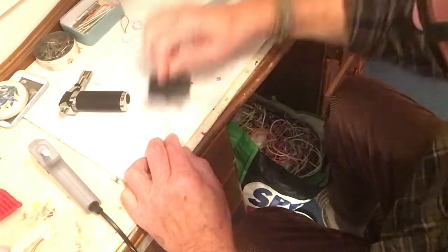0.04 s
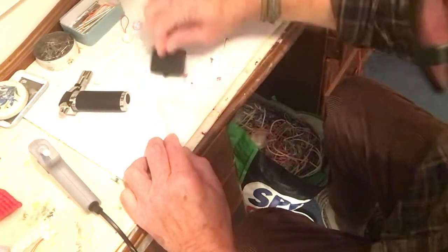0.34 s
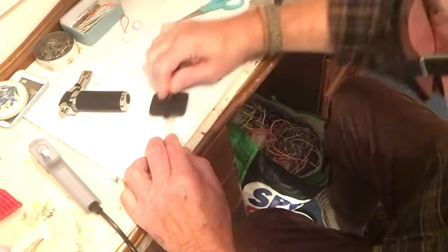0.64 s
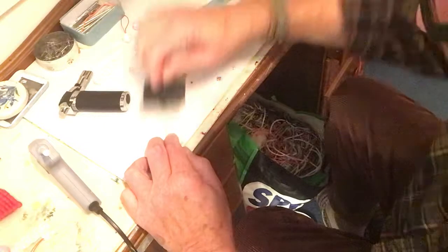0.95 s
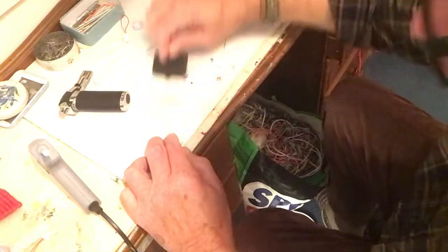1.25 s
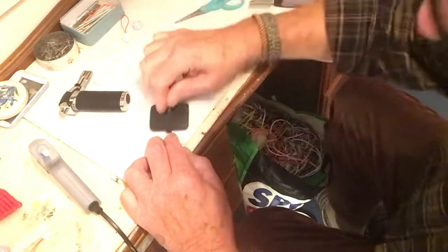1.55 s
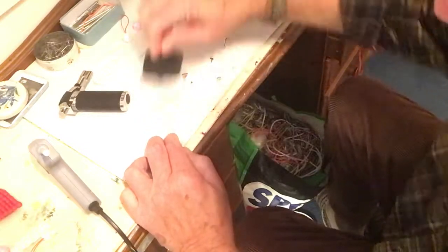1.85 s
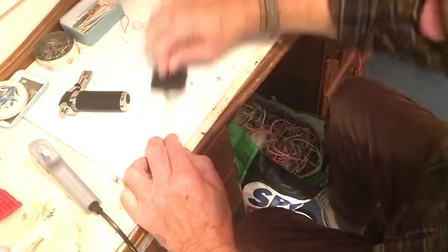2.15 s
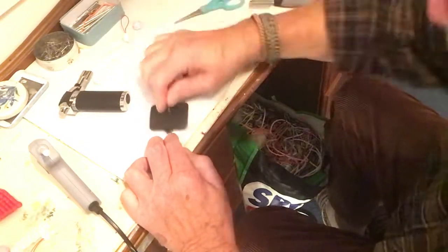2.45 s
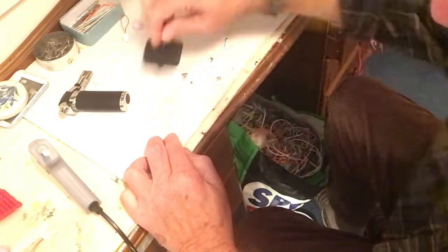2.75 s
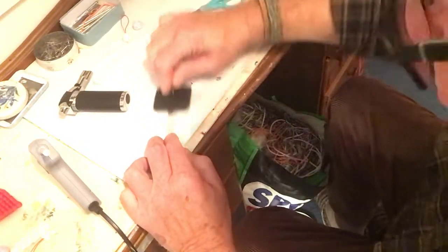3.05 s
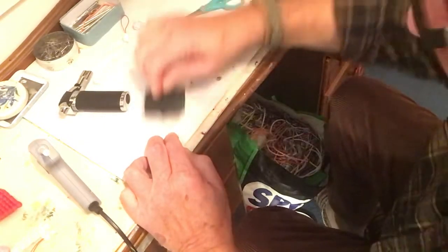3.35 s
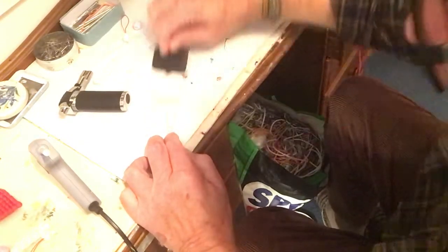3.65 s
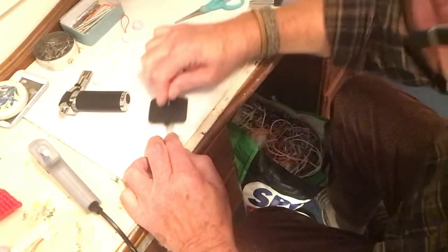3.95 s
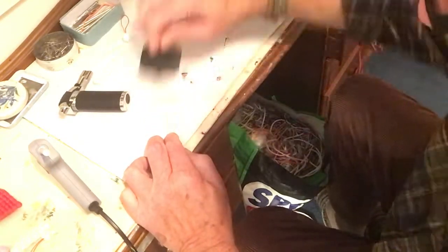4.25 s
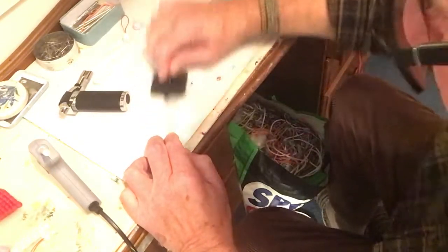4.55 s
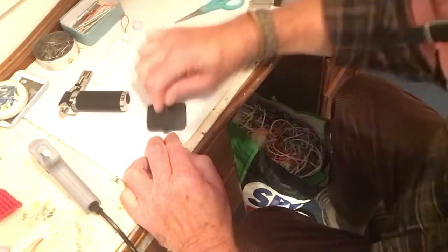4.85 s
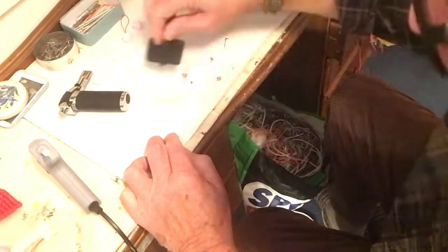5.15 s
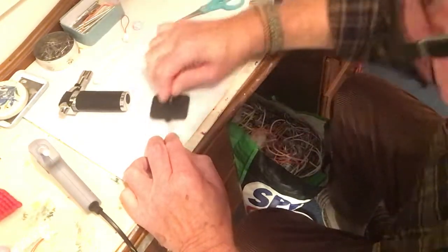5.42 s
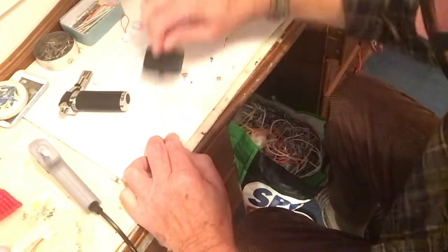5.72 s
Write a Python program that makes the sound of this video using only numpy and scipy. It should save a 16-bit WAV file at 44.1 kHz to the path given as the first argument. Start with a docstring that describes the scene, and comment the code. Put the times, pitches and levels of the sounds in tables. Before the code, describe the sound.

A small hand brush combs cord fibres on a wooden workbench in dry, scratchy strokes, about two a second, each with a light knock.

```python
"""Dry, swelling brush strokes, about two a second, each led in by a tick and a wooden knock.
A small hand brush is combing out cord fibres on a workbench. It lands and rings the bench top, then drags:
countless bristles flick over the fibres in a hiss, with a hollow rasp while the brush is pressed down
and little snaps as tangles give way. One close microphone in a small, quiet room."""
import sys
import numpy as np
from scipy import signal
from scipy.fft import rfft, irfft, next_fast_len
from scipy.io import wavfile
from scipy.ndimage import map_coordinates

SR = 44100
rng = np.random.default_rng(int(sys.argv[2]) if len(sys.argv) > 2 else 0)


def file_out(sig):
    """Save sig as 16-bit WAV at sys.argv[1]."""
    # one column per channel
    cols = np.atleast_2d(sig).T
    # limit, then scale
    lim = np.clip(cols, -1, 1)
    pcm = np.round(lim * 32767).astype(np.int16)
    wavfile.write(sys.argv[1], SR, pcm)


N = 263718

# the brush lands or bumps on the bench: (t/s, knock level/dB, thud level/dB, tick level/dB, splash level/dB)
LANDINGS = [(0.098, -41.5, -47, -42, -50.5), (0.568, -33.5, -46, -47, -48), (1.021, -26, -46, -31, -45.5),
            (1.520, -43.5, -56, -55, -51.5), (1.645, -33, -49, -33, -49), (1.995, -29.5, -46.5, -36, -45),
            (2.439, -35, -52.5, -36.5, -45), (2.898, -45, -55, -57, -71), (2.918, -35.5, -49.5, -43, -51.5),
            (3.416, -43, -51.5, -55, -52), (3.898, -42, -51.5, -54, -51), (4.389, -43, -52, -54, -50.5),
            (4.868, -35, -48, -44.5, -47.5), (5.321, -27.5, -47, -35, -50.5), (5.865, -40.5, -51, -57, -54)]
# tone colour of flicking bristles: (f/Hz, level/dB)
BRISTLE_SPECTRUM = [(60, -8.5), (260, -2), (480, 0), (700, 4), (1200, -1.5), (1700, 2), (3000, -1),
                    (4700, -2.5), (7700, -5.5), (10100, -8), (13000, -5), (14500, -7), (16000, -11)]


def amp(db):
    """Decibels to gain."""
    return 10 ** (np.asarray(db) / 20)


def unit(x):
    """Scale to rms 1."""
    return x / np.sqrt(np.mean(x ** 2) + 1e-20)


def along(points, hz):
    """Read a curve of (f/Hz, value) points on a log frequency axis."""
    f, v = np.transpose(points)
    return np.interp(np.log(hz + 1), np.log(f + 1), v)


def wobble(rate):
    """A smooth random modulator, rate knots a second."""
    return map_coordinates(rng.standard_normal(int(N * rate / SR) + 4), [np.arange(N) * rate / SR])


def filtered(x, response):
    """Filter x by a complex frequency response."""
    size = next_fast_len(N + 8192)
    return irfft(rfft(x, size) * response(np.fft.rfftfreq(size, 1 / SR)), size)[:N]


def coloured(x, spectrum):
    """x through an EQ curve of (f/Hz, level/dB), at rms 1."""
    return unit(filtered(x, lambda hz: amp(along(spectrum, hz))))


def resonant(x, modes):
    """x through resonances of (f/Hz, width/Hz, level/dB), at rms 1."""
    def response(f):
        return sum(amp(db) * 1j * f * width / (hz * hz - f * f + 1j * f * width) for hz, width, db in modes)
    return unit(filtered(x, response))


def add(track, s, sound):
    """Mix a sound in at s seconds."""
    start = max(round(s * SR), 0)
    track[start:start + len(sound)] += sound[:N - start]


def bursts(hits, t60):
    """An envelope that jumps at each (t/s, level/dB) hit and dies away."""
    envelope, t = np.zeros(N), np.arange(SR // 4) / SR
    for s, db in hits:
        add(envelope, s, amp(db - 60 * t / t60))
    return envelope


def room_tone(rumble_db=-72, air_db=-77):
    """A bed of low, uneven rumble and faint steady hiss."""
    # tone colours of the rumble and the hiss: (f/Hz, level/dB)
    rumble_spectrum = [(25, -30), (45, -0.5), (85, 0.5), (200, -3.5), (290, -4), (400, -10.5), (800, -15.5),
                       (2000, -51)]
    air_spectrum = [(150, -20), (400, -40), (800, -13.5), (1400, -6.5), (2200, -12.5), (3400, -12),
                    (8000, -17.5), (13000, -22), (15000, -27), (16000, -45)]
    rumble = coloured(rng.standard_normal(N), rumble_spectrum) * amp(3.5 * wobble(11))
    air = coloured(rng.standard_normal(N), air_spectrum)
    return amp(rumble_db) * rumble + amp(air_db) * air


def room_reverb(x, predelay_s=0.004):
    """A short diffuse answer from the walls, lingering longest in the bass."""
    # decay of the room: (f/Hz, t60/s)
    decay_times = [(150, 0.72), (1000, 0.2), (4000, 0.28), (14000, 0.17)]
    hz, t, noise = signal.stft(rng.standard_normal(SR // 2), SR, nperseg=256)
    decay = amp(-60 * t / along(decay_times, hz)[:, None])
    tail = signal.istft(noise * decay, SR, nperseg=256)[1]
    tail = np.pad(tail, (round(predelay_s * SR), 0))
    return signal.fftconvolve(x, tail / np.linalg.norm(tail))[:N]


def snags(t60=0.024, q=6, crack_db=-6):
    """Bright little snaps as tangled fibres give way, each around its own pitch."""
    # a bristle snaps free of a tangle: (t/s, level/dB, f/Hz)
    releases = [(0.184, -50, 3520), (0.281, -46, 5000), (0.638, -46, 3520), (0.725, -40, 3500),
                (0.795, -41, 3470), (0.822, -43, 2900), (1.3127, -37, 6900), (2.152, -39, 1900),
                (2.251, -44, 3080), (3.944, -57, 3500), (4.915, -55, 5030), (5.021, -46, 6000),
                (5.914, -50, 4000)]
    snaps, t = np.zeros(N), np.arange(SR // 10) / SR
    for s, db, hz in releases:
        crack = rng.standard_normal(len(t))
        ring = unit(signal.lfilter(*signal.iirpeak(hz, q, SR), crack))
        add(snaps, s, amp(db - 60 * t / t60) * (ring + amp(crack_db) * crack))
    return snaps


def flicks(per_second, clump_db):
    """Dense random bristle impulses, bunched as tufts catch and let go."""
    struck = rng.random(N) < per_second / SR
    return struck * rng.standard_normal(N) * amp(clump_db * wobble(350))


def landing_ticks(gain_db=-2, graze_db=-16, lead_s=0.0047):
    """The longest bristles graze first; the rest hit with a short tick, then splay with a brief splash."""
    # tone colour of the impact: (f/Hz, level/dB)
    tick_spectrum = [(100, -15), (600, 11.5), (1500, 7), (2300, -7), (3500, 7), (5300, 2), (7500, -13),
                     (13000, -18), (16000, -11)]
    strike = bursts([(s, db) for s, _, _, db, _ in LANDINGS], t60=0.011)
    tick = strike * coloured(rng.standard_normal(N), tick_spectrum)
    graze = bursts([(s - lead_s, db + graze_db) for s, _, _, _, db in LANDINGS], t60=0.013)
    splay = bursts([(s, db) for s, _, _, _, db in LANDINGS], t60=0.1)
    splash = (graze + splay) * coloured(flicks(per_second=6000, clump_db=-2.5), BRISTLE_SPECTRUM)
    return amp(gain_db) * (tick + splash)


def bench_knocks(gain_db=-4, attack_cycles=1.23, deep_hz=200, scatter_db=0.5, settle_s=0.043, mute_db=-6):
    """Each landing rings the bench; the weight of the hand drives its deepest modes."""
    # modes of the wooden top: (f/Hz, level/dB, t60/s)
    bench_modes = [(78.5, 5.5, 0.23), (110.8, 7, 0.25), (138, -2, 0.29), (169, 4.5, 0.27),
                   (235.7, -5, 0.26), (267.2, -6, 0.29), (289.2, -3, 0.2), (314.3, -13, 0.26),
                   (353.3, -3.5, 0.18), (425, -15.5, 0.11), (456, -15, 0.1), (552, -12, 0.071),
                   (598, -19.5, 0.032), (677, -12, 0.044), (834, -19.5, 0.063)]
    bench, t = np.zeros(N), np.arange(SR // 2) / SR
    hz, mode_db, t60 = np.transpose(bench_modes)[:, :, None]
    swell = 1 - np.exp(-hz * t / attack_cycles)  # the bristles cushion the blow, so low modes build slowly
    muting = amp(mute_db * (1 + np.tanh((t - settle_s) / 0.012)) / 2)  # the settling hand damps the top
    for s, knock_db, thud_db, _, _ in LANDINGS:
        scatter, detune, phase = rng.standard_normal((3, len(bench_modes), 1))
        level_db = np.where(hz < deep_hz, thud_db, knock_db) + mode_db + scatter_db * scatter
        partials = np.sin(2 * np.pi * (hz * (1 + 0.015 * detune) * t + phase))
        ring = swell * amp(level_db - 60 * t / t60) * partials
        add(bench, s, muting * ring.sum(axis=0))
    return amp(gain_db) * bench


def arch(t, crest_s, release_s, swell_db, sag_db_per_s, fall_db_per_s, bite_s=0.043):
    """Stroke envelope: the bristles take hold by t = 0, swell to a crest, sag, then fall on release."""
    hold = np.clip(1 + t / bite_s, 0, 1)
    short_of_crest = np.clip(1 - t / crest_s, 0, 1)
    sag_db = sag_db_per_s * np.maximum(t - crest_s, 0)
    fall_db = fall_db_per_s * np.maximum(t - release_s, 0)
    return hold * amp(-swell_db * short_of_crest - sag_db - fall_db)


def stroke_envelopes(ease_off_s=0.035):
    """Speed and pressure of the brush; the hand takes its weight off just before the lift."""
    # pulls along the fibres: (bite t/s, then time to lift/s, to full speed/s, to full pressure/s,
    # hiss level/dB, hiss swell/dB, rasp level/dB, rasp swell/dB)
    strokes = [ (0.160, 0.16, 0.14, 0.084, -41, 14, -44.5, 16.5),
               (0.601, 0.19, 0.14, 0.13, -41, 15.5, -45, 7), (1.087, 0.2, 0.15, 0.069, -42, 9, -44.5, 8.5),
               (1.607, 0.14, 0.062, 0.037, -40.5, 10, -41, 14),
               (2.052, 0.16, 0.085, 0.097, -39, 14, -46, 6.5),
               (2.505, 0.17, 0.130, 0.100, -39.5, 16, -44, 10.5),
               (2.955, 0.200, 0.150, 0.13, -42, 14.5, -45.5, 11),
               (3.473, 0.18, 0.12, 0.086, -40, 14, -45.5, 11.5),
               (3.958, 0.187, 0.140, 0.086, -40, 11.5, -43.5, 12.5),
               (4.455, 0.18, 0.11, 0.065, -41, 11, -44.5, 15),
               (4.925, 0.17, 0.12, 0.084, -39.5, 9.5, -44.5, 8.5),
               (5.380, 0.21, 0.180, 0.15, -41, 12.5, -44, 10.5),
               (5.924, 0.190, 0.093, 0.107, -40, 14, -48.5, 11.5), ]
    speed, pressure = np.zeros((2, N))
    t = np.arange(N) / SR
    for s, lift, fastest, hardest, hiss_db, hiss_swell_db, rasp_db, rasp_swell_db in strokes:
        speed += amp(hiss_db) * arch(t - s, fastest, lift, hiss_swell_db,
                                     sag_db_per_s=33.5, fall_db_per_s=271)
        pressure += amp(rasp_db) * arch(t - s, hardest, lift - ease_off_s, rasp_swell_db,
                                        sag_db_per_s=30, fall_db_per_s=307)
    return speed, pressure


def shifting_tufts(x, depth_db, width_hz, life_s):
    """Random bands of x light up and fade as different tufts take the load; at rms 1."""
    hz, t, bands = signal.stft(x, SR, nperseg=512)
    grid = np.meshgrid(hz / width_hz, t / life_s, indexing="ij")
    load = map_coordinates(rng.standard_normal((160, 400)), grid, mode="mirror")
    return unit(signal.istft(bands * amp(depth_db * load), SR, nperseg=512)[1][:N])


def bristle_hiss():
    """Countless flicks over the fibres blur into a hiss with a bright sheen."""
    # bands in which the bristles sing: (f/Hz, width/Hz, boost/dB)
    sheen_bands = [(1950, 270, 0), (3090, 890, 4), (3900, 700, 4), (5510, 1100, 5.5), (6440, 220, 6),
                   (6850, 340, 5.5), (8570, 2470, 7.5), (11530, 3100, 5)]

    def sheen(f):
        return amp(sum(db / (1 + (2 * (f - hz) / width) ** 2) for hz, width, db in sheen_bands))
    grains = filtered(flicks(per_second=24000, clump_db=0.36), sheen)
    return shifting_tufts(coloured(grains, BRISTLE_SPECTRUM), depth_db=1.82, width_hz=301.6, life_s=0.06)


def brush_rasp():
    """Flicking bristles drive the pressed brush into a hollow rasp."""
    # upper resonances of the brush on the bench: (f/Hz, width/Hz, level/dB)
    rasp_modes = [(1151, 13, 8.5), (1255, 55, 8), (1333, 52, 4), (1420, 82, 2.5), (1583, 124, 4),
                  (1767, 120, -1), (1875, 113, 1.5), (2050, 77, -1), (2483, 81, 0.5), (2880, 95, -32)]
    rasp = resonant(flicks(per_second=14000, clump_db=0.5), rasp_modes)
    return shifting_tufts(rasp, depth_db=1.5, width_hz=267.0, life_s=0.05)


def brushing(rasp_db=-1, scrape_db=-8, groan_db=-14, uneven_db=0.88, bend_lag_s=0.021):
    """Hiss rides on speed; pressure drives the brush and the bench top to rasp, scrape and groan."""
    # lower resonances of the brush on the bench: (f/Hz, width/Hz, level/dB)
    scrape_modes = [(640, 47, -10), (724, 93, 0.5), (826, 69, -2.5), (907, 57, 7.5)]
    groan_modes = [(197, 30, -13), (271, 61, -0.5), (335, 27, -18.0)]
    speed, pressure = stroke_envelopes()
    t = np.arange(N) / SR
    bend = np.interp(t - bend_lag_s, t, pressure)  # the low end joins late, once the bristles bend over
    hiss = speed * bristle_hiss()
    rasp = amp(rasp_db) * pressure * brush_rasp()
    scrape = amp(scrape_db) * bend * resonant(rng.standard_normal(N), scrape_modes)
    groan = amp(groan_db) * bend * resonant(rng.standard_normal(N), groan_modes)
    return (hiss + rasp + scrape + groan) * amp(uneven_db * wobble(60))


def scene(reverb_db=-11):
    """Close brushwork with a touch of room, alike in both channels."""
    work = brushing() + bench_knocks() + landing_ticks() + snags()
    mono = work + amp(reverb_db) * room_reverb(work) + room_tone()
    return np.array([mono, mono])


def record(dry, low_cut_hz=52, top_hz=15850):
    """A low cut thins the deepest bass; a steep high cut takes off the very top."""
    low_cut = signal.butter(3, low_cut_hz, "highpass", fs=SR, output="sos")
    high_cut = lambda hz: np.clip((top_hz - hz) / 200 + 0.5, 0, 1)
    return np.array([filtered(channel, high_cut) for channel in signal.sosfilt(low_cut, dry)])


dry = scene()
out = record(dry)
file_out(out)
```